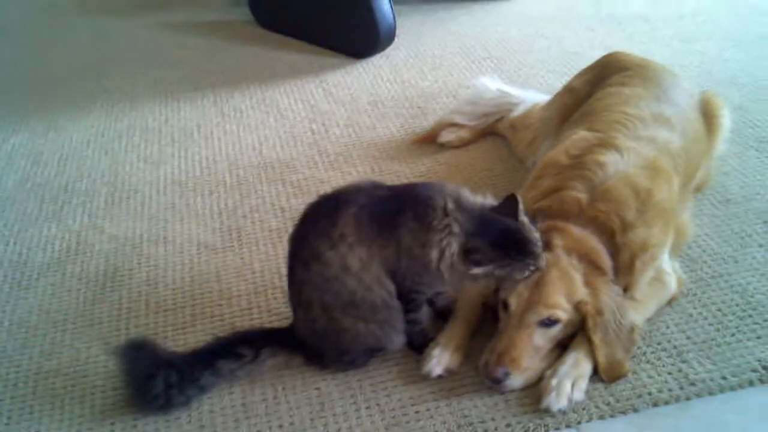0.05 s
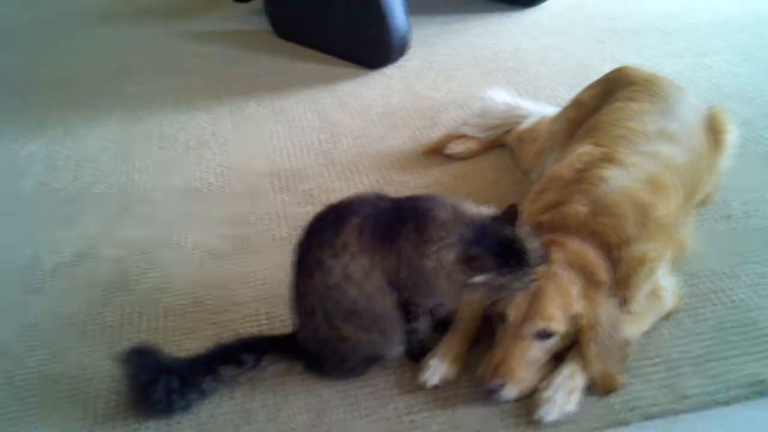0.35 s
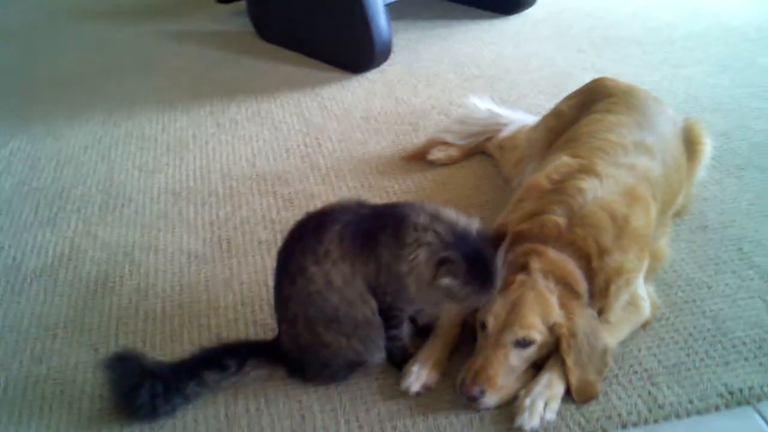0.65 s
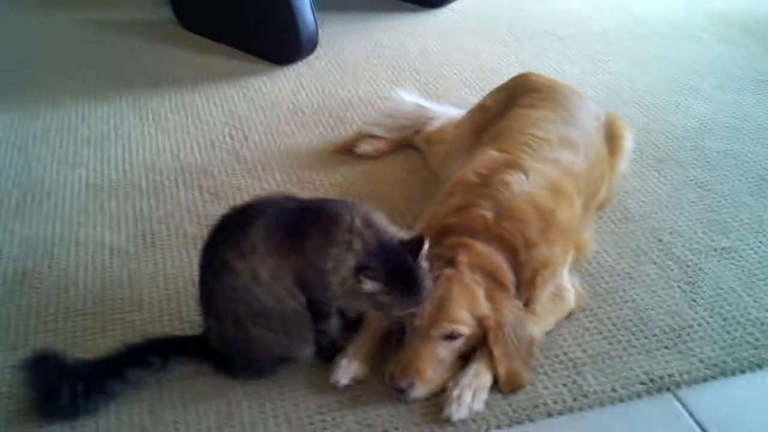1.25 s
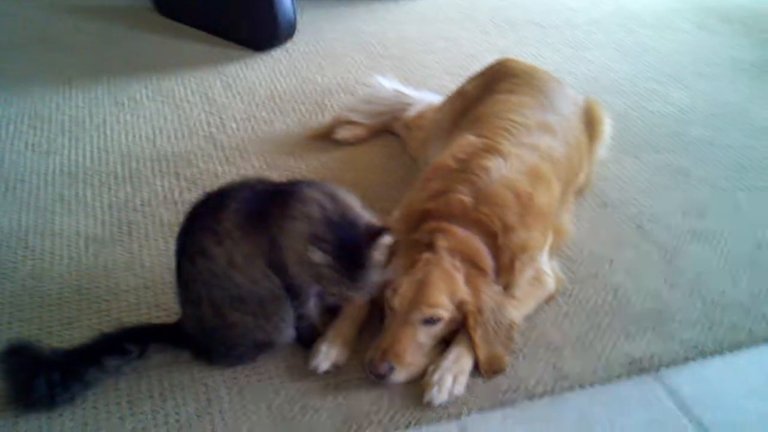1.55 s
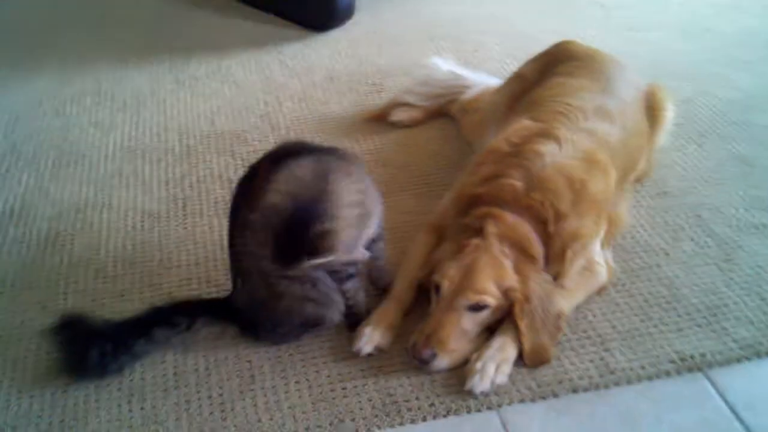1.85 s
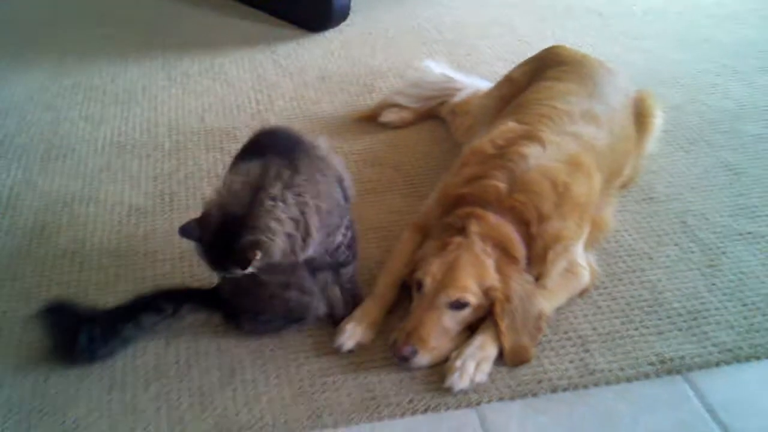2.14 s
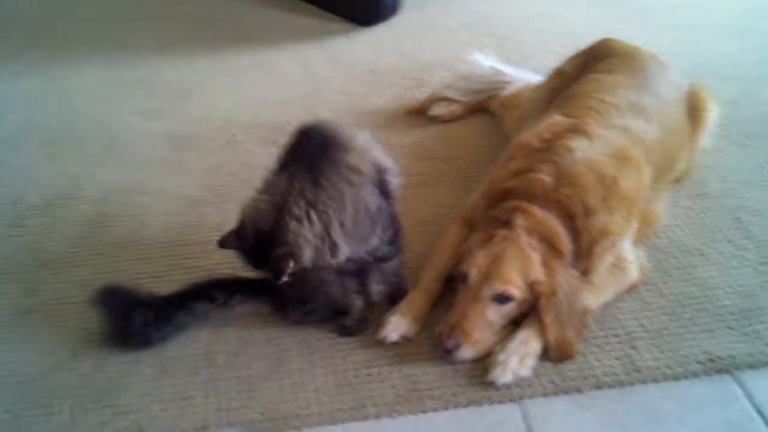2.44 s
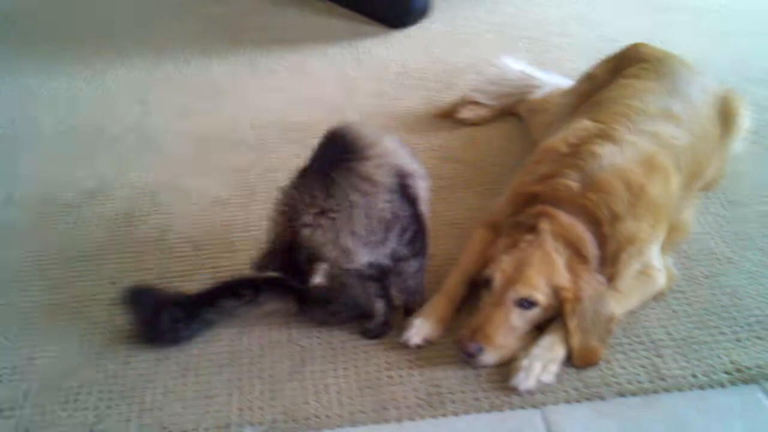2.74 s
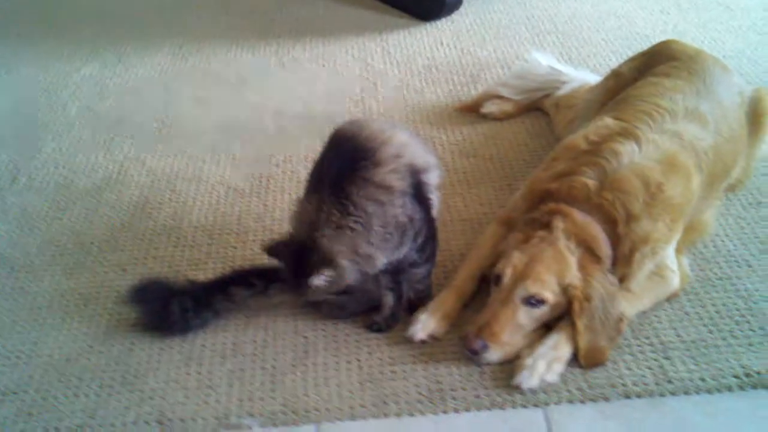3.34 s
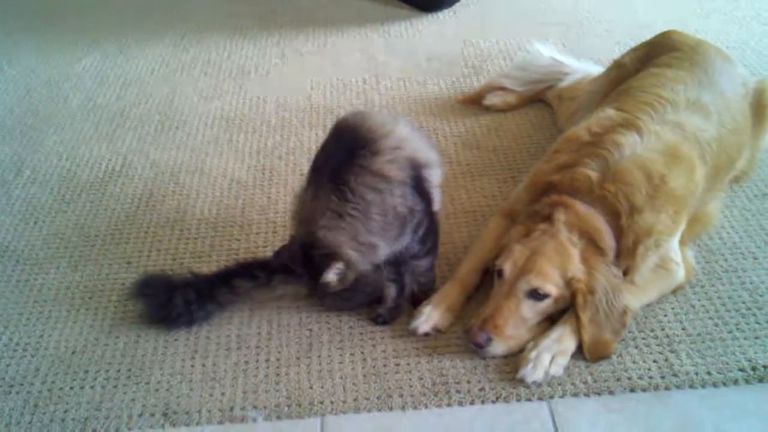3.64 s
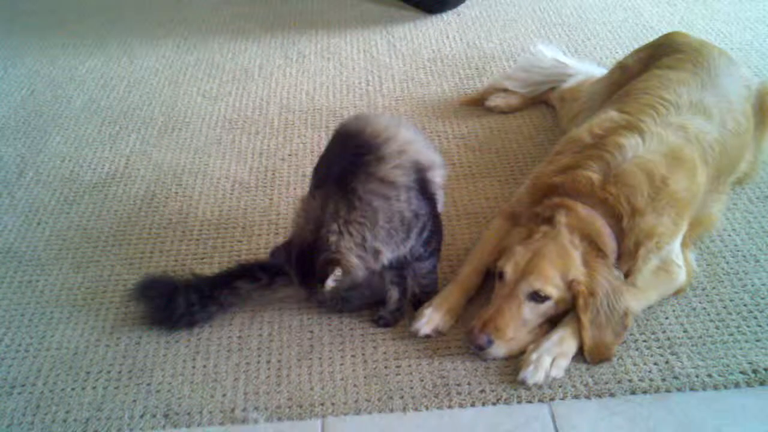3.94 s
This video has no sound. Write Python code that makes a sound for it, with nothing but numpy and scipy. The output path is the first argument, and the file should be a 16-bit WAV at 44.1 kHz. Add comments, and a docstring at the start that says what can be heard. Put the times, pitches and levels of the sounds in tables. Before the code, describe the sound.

A single brief bump against the camera breaks a quiet room's soft hiss and hum.

```python
"""A very quiet carpeted room where a cat and a dog rest, heard by a hand-held camera with two mic ports.
From the start the ports hiss, the camera's motor hums and an appliance drones far off. Faint rustles and
dull ticks dot the first three seconds; the cat's fur crackles near 1.3 s and 2.3 s. At 3.7 s one short
knock rings the camera's case. Each channel is one port minus the delayed other, which widens the sound."""
import sys
import numpy as np
from scipy import signal
from scipy.fft import rfft, irfft
from scipy.io import wavfile

SR = 44100
rng = np.random.default_rng(int(sys.argv[2]) if len(sys.argv) > 2 else 0)


def transcribe(signal):
    """Save signal, clipped to [-1, 1], as a 16-bit WAV file at the path in sys.argv[1]."""
    frames = np.atleast_2d(signal).T
    limited = np.clip(frames, -1, 1)
    pcm = np.round(limited * 32767).astype(np.int16)
    wavfile.write(sys.argv[1], SR, pcm)


N = 176400

# a hard touch, the soft blow, a faint rattle as the case settles (time [s], strength [dB], corner [Hz])
KNOCK_CONTACTS = [(3.6839, 27, 15000), (3.688, 45, 517), (3.7036, 12, 300), (3.7083, 9, 300),
                  (3.7114, 2, 596)]
# ringing modes of the camera's case (pitch [Hz], width [Hz], gain [dB])
CASE_MODES = [(197, 60, -4.5), (290, 394, 3.5), (1514, 197, -5), (1745, 500, -0.5), (2610, 120, 3.5),
              (4300, 610, 1)]
def knock():
    """Contacts ring the well-damped case; the soft ones reach only its low modes."""
    force = sum(undb(db) * impulse(at) / (1 + 1j * freqs() / hz) ** 2 for at, db, hz in KNOCK_CONTACTS)
    case = sum(undb(db) * resonance(hz, width) for hz, width, db in CASE_MODES)
    tone = slope(2300, "high", order=1) * slope(1282, "low", order=4)
    return irfft(-force * case * tone, N)


def knock_grit():
    """A few milliseconds of broadband crackle that grows with each contact's strength, different at each port."""
    bursts = sum(undb(db / 2 - 69.5) * fade(at, decay_s=0.0044) for at, db, _ in KNOCK_CONTACTS)
    return bursts * np.array([noise(slope(8950, "low", order=1)) for _ in range(2)])


def knock_tail():
    """The carpeted room gives the blow a short, dark tail."""
    blow_at = KNOCK_CONTACTS[1][0]
    return undb(-48) * fade(blow_at, decay_s=0.0071) * noise(resonance(445, width_hz=445))


# faint ticks in the room (time [s], strength [dB], pitch [Hz], width [Hz])
ROOM_TICKS = [(0.705, -15, 880, 380), (.7125, -23, 950, 250), (.7208, -31, 1400, 800),
              (.7853, -12, 350, 230), (.7955, -27, 700, 400), (1.2165, -30, 1100, 1000),
              (1.2246, -30.5, 1800, 1200), (2.7118, -29, 1700, 1200)]
def ticks():
    """Small dull ticks, each with a short scatter of reflections and a low ring of the room."""
    out = 0
    for at, db, hz, width_hz in ROOM_TICKS:
        reflections = undb(-40) * fade(at, decay_s=0.022) * rng.standard_normal(N)
        tick = filt(irfft(impulse(at), N) + reflections, resonance(hz, width_hz))
        tail = undb(-28.5) * fade(at, decay_s=0.064) * rng.standard_normal(N)
        low_ring = filt(tail, resonance(374, width_hz=74))
        out = out + undb(db) * (low_ring - tick)
    return filt(out, slope(1200, "low", order=2))


# handling noise, probably fingers shifting (time [s], spread [s], rub level [dB], hiss level [dB])
HAND_RUSTLES = [(0.1, 0.015, -58, -71.5), (0.142, 0.0061, -62, -81), (0.726, 0.012, -59, -66.5),
                (0.757, 0.0072, -57.5, -82), (0.791, 0.012, -55.5, -72), (1.226, .004, -67, -66.5),
                (1.549, 0.0071, -66, -71), (2.375, 0.0093, -68, -76), (2.565, 0.0035, -65, -69)]
def rustles():
    """Brief swells of low rubbing and fine hiss from the hand on the case."""
    rub = noise(resonance(280, width_hz=290) ** 2)
    hiss = noise(resonance(2820, width_hz=8000))
    return sum(swell(at, spread_s) * (undb(rub_db) * rub + undb(hiss_db) * hiss)
               for at, spread_s, rub_db, hiss_db in HAND_RUSTLES)


# the cat nuzzles and grooms (time [s], spread [s], level [dB])
FUR_STROKES = [(1.314, 0.062, -79.5), (2.29, 0.16, -89.5)]
def fur():
    """A fine, grainy crackle of fur that swells while the cat moves."""
    strokes = sum(undb(db) * swell(at, spread_s) for at, spread_s, db in FUR_STROKES)
    return strokes * flutter(depth_db=4, rate_hz=34) * noise(resonance(3420, width_hz=4800))


# partials of the motor's hum (harmonic [number], rms level [dB])
MOTOR_HARMONICS = [(1, -76.5), (2, -69), (3, -71), (4, -74.5), (5, -76.5), (6, -81.5), (7, -85), (9, -86),
                   (10, -87), (11, -86), (12, -93.5)]
def motor():
    """The camera's small motor hums through the case."""
    phase = turning(hz=92.7, wobble=0.00079)
    return np.sqrt(2) * sum(undb(db) * np.sin(round(k) * phase + 2 * np.pi * rng.random())
                            for k, db in MOTOR_HARMONICS)


# noise floor of each port (frequency [Hz], level [dB per Hz])
PORT_SPECTRUM = [(20, -107), (50, -103.5), (95, -91), (160, -90), (300, -91.5), (500, -98), (750, -103.5),
                 (1050, -107), (1500, -109.5), (2500, -110), (3600, -114), (4200, -115.8), (4500, -114),
                 (5600, -115.9), (7800, -112.3), (14000, -110.4)]
def port_hiss():
    """Each port has its own bed of hiss; the two levels waver slightly together."""
    hiss = np.array([noise_bed(PORT_SPECTRUM) for _ in range(2)])
    return hiss * flutter(depth_db=-0.48, rate_hz=4.6)


# murmur of the room (frequency [Hz], level [dB per Hz])
ROOM_SPECTRUM = [(40, -118), (120, -103), (230, -95), (420, -102), (800, -112), (1600, -120), (4000, -135)]
def room_tone():
    """A low, steady murmur under everything."""
    return noise_bed(ROOM_SPECTRUM)


# tones of the appliance (pitch [Hz], rms level [dB])
DRONE_TONES = [(120, -87.5), (224, -77), (246, -76.5), (323, -81.5), (414.5, -78)]
def appliance():
    """A distant appliance drones, each tone drifting a little in pitch."""
    return np.sqrt(2) * sum(undb(db) * np.sin(turning(hz, wobble=0.00495)) for hz, db in DRONE_TONES)


def undb(db):
    """Decibels to gain."""
    return 10 ** (np.asarray(db) / 20)


def freqs():
    """Frequency of every spectral bin, kept above zero."""
    return np.maximum(np.arange(N // 2 + 1) * SR / N, 1e-3)


def filt(x, response):
    """Pass a sound through a frequency response."""
    return irfft(rfft(x) * response, N)


def resonance(hz, width_hz):
    """Response of one damped mode, gain 1 at its centre."""
    f = freqs()
    return 1 / (1 + 1j * (f / hz - hz / f) * hz / width_hz)


def slope(hz, kind, order):
    """Response of a low-pass or high-pass."""
    return signal.freqs(*signal.butter(order, 1, kind, analog=True), freqs() / hz)[1]


def noise(response):
    """Noise of rms 1 with the given colour."""
    x = filt(rng.standard_normal(N), response)
    return x / x.std()


def noise_bed(points):
    """Steady noise shaped by points of (frequency [Hz], level [dB per Hz])."""
    hz, db = np.array(points).T
    colour = undb(np.interp(np.log(freqs()), np.log(hz), db))
    return filt(rng.standard_normal(N), colour * np.sqrt(SR / 2))


def drift(rate_hz):
    """Smooth random modulation of rms 1."""
    return noise(slope(rate_hz, "low", order=2))


def flutter(depth_db, rate_hz):
    """Gain that wavers at random around 1."""
    return undb(depth_db * drift(rate_hz))


def impulse(at):
    """Spectrum of a unit push at a given time."""
    return np.exp(-2j * np.pi * freqs() * at)


def fade(at, decay_s):
    """Instant attack and exponential decay."""
    age = np.arange(N) / SR - at
    return (age >= 0) * np.exp(-np.abs(age) / decay_s)


def swell(at, spread_s):
    """Bell-shaped envelope that peaks at a given time."""
    age = np.arange(N) / SR - at
    return np.exp(-(age / spread_s) ** 2 / 2)


def turning(hz, wobble):
    """Phase of a slightly unsteady rotation."""
    speed_hz = hz * (1 + wobble * drift(rate_hz=2.16))
    return 2 * np.pi * (np.cumsum(speed_hz) / SR + rng.random())


def scene():
    """Airborne sound reaches both ports alike, sound in the case the right; each has its hiss and grit."""
    airborne = port_hiss() + room_tone() + appliance() + ticks() + fur() + knock_tail()
    in_case = motor() + rustles() + knock()
    return airborne + np.array([np.zeros(N), in_case]) + knock_grit()


def record(dry):
    """The ports soft-clip; each loses the delayed other, mostly below the crossover; the top is cut."""
    ceiling_db, lag_s, balance_db = -5.5, 0.00038, -0.45
    crossover_hz, top_hz = 4200, 13950
    ports = dry / (1 + (dry / undb(ceiling_db)) ** 8) ** (1 / 8)
    crossfeed = np.interp(freqs() - crossover_hz, [-100, 100], [0.99, 0.21])
    wide = ports - filt(ports[::-1], crossfeed * impulse(lag_s))
    balance = undb(np.array([[balance_db], [-balance_db]]) / 2)
    high_cut = np.interp(freqs() - top_hz, [-50, 50], [1, 0])
    return filt(wide * balance, high_cut)


dry = scene()
out = record(dry)
transcribe(out)
```